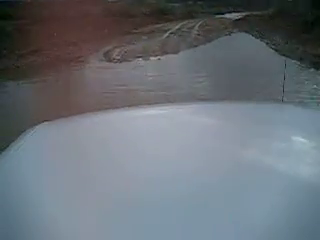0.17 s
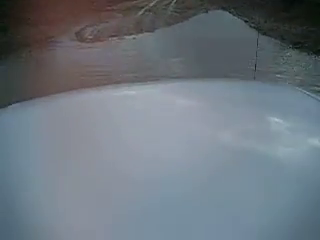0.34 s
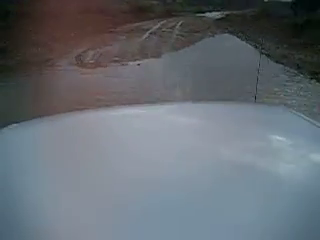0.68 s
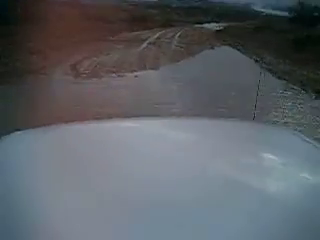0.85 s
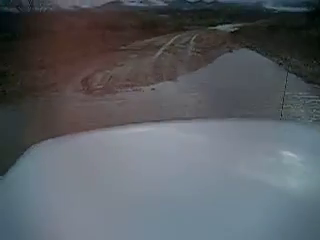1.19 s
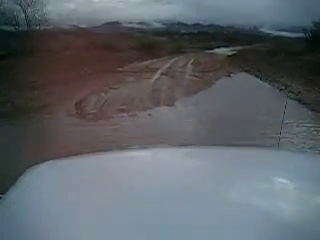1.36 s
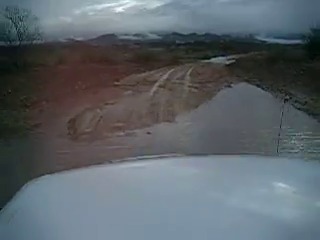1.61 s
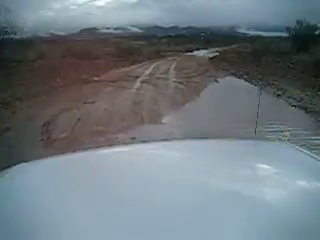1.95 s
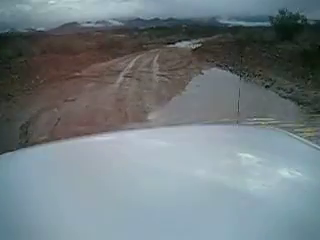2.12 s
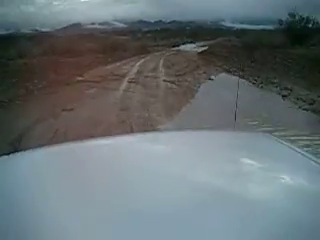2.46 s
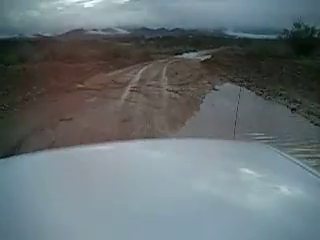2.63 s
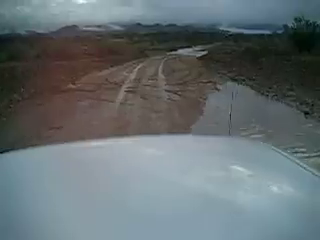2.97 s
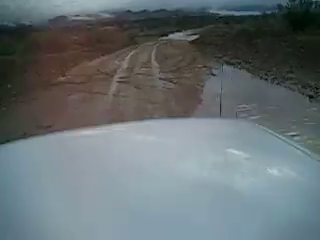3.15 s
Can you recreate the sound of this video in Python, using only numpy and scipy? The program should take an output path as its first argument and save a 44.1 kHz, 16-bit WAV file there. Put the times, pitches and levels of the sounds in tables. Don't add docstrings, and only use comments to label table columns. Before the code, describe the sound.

Low steady engine drone inside a vehicle creeping through water, with dull thumps, plops and sloshing.

```python
import sys
import numpy as np
from scipy import signal
from scipy.fft import rfft, irfft
from scipy.io import wavfile
from scipy.ndimage import uniform_filter1d

SR = 44100
rng = np.random.default_rng(int(sys.argv[2]) if len(sys.argv) > 2 else 0)


def to_linear_factor(level_db):
    exponent = np.asarray(level_db, float) / 20
    return 10 ** exponent


def wav_record(signal):
    frames = np.transpose(np.atleast_2d(signal))
    bounded = np.clip(frames, -1, 1)
    quanta = np.round(bounded * 32767).astype(np.int16)
    wavfile.write(sys.argv[1], SR, quanta)


N = 145530


def evened(x):
    return x / np.sqrt(np.mean(x ** 2) + 1e-20)


def curve(table, column=1):
    rows = np.transpose(table)
    return np.interp(np.arange(N) / SR, rows[0], rows[column])


def drift(top_hz):
    count = N // 64 + 2
    z = rfft(rng.standard_normal(count))
    hz = np.arange(len(z)) * SR / N
    rolloff = 1 / (1 + (hz / top_hz) ** 4)
    slow = irfft(z * rolloff * (hz > 0.4), count)
    return np.interp(np.arange(N) / 64, np.arange(len(slow)), evened(slow))


def noise(shape, size, patchy_db, wide_hz, long_s):
    hop, hz = size // 4, np.fft.rfftfreq(size, 1 / SR)
    real, imaginary, patches = rng.standard_normal((N // hop + 5, len(hz), 3)).T
    patches = uniform_filter1d(patches, max(round(wide_hz * size / SR), 1), axis=0)
    patches = evened(uniform_filter1d(patches, max(round(long_s * SR / hop), 1), axis=1))
    f, db = np.transpose(shape)
    colour = np.interp(np.log(hz + 1), np.log(f + 1), db)
    colour -= 18 * np.log2(np.maximum(f[0] / (hz + 1), 1))
    colour -= 12 * np.log2(np.maximum(hz / f[-1], 1))
    z = (real + 1j * imaginary) * to_linear_factor(colour[:, None] + patchy_db * patches)
    return evened(signal.istft(z, nperseg=size, noverlap=size - hop)[1][:N])


def add(mix, s, sound):
    part = mix[round(s * SR):][:len(sound)]
    part += sound[:len(part)]


# order of the cycle, level in dB.
ORDER_DB = [(2, -38), (3, -32.5), (4, -29), (5, -22), (6, -37.5), (7, -40), (8, -31.5), (9, -38), (10, -40),
            (11, -30.5), (12, -36.5), (13, -23.5), (14, -36.5), (15, -37), (16, -40.5), (21, -45.5),
            (22, -42.5), (23, -37.5), (24, -41), (26, -45.5), (28, -44)]
# time in seconds, cycle rate in Hz.
SPEED = [(0, 12.55), (.15, 12.53), (.45, 12.28), (.7, 12.34), (1.1, 11.97), (1.5, 12.14), (1.72, 12.52),
         (2.02, 12.54), (2.022, 12.12), (2.4, 12.25), (3.05, 12.54), (3.3, 12.55)]
# time in seconds, level in dB, exhaust ring in dB.
ENGINE_LEVEL = [(0, -3.5, -2.5), (.22, 3.5, -8), (.3, 0.5, -2), (.6, 1, 2), (.9, 0, 0), (1.04, -2.5, 1.5),
                (1.085, -5, -0.5), (1.14, -1, 2), (1.5, -2.5, 1), (1.9, 0, 1.5), (2.1, 1, -0.5), (2.5, -1, 1),
                (2.56, -2, -2), (2.62, 0, 2.5), (2.83, 0, 1.5), (2.87, -2, -2), (2.92, -1, 1), (3.3, 0, 0)]


def engine():
    waver_db, waver_turns, ring_from_order = 1.3, 0.03, 12.5
    turns = np.cumsum(curve(SPEED)) / SR
    ring_db = curve(ENGINE_LEVEL, column=2)
    drone = np.zeros(N)
    for order, db in ORDER_DB:
        level_db = db + waver_db * drift(5) + ring_db * (order > ring_from_order)
        phase = round(order) * turns + rng.random() + waver_turns * drift(3.3)
        drone += to_linear_factor(level_db) * np.sin(2 * np.pi * phase)
    return np.sqrt(2) * to_linear_factor(curve(ENGINE_LEVEL)) * drone


def mode(db, hz, t60, rise_s):
    t = np.arange(SR // 3) / SR
    return (1 - np.exp(-t / rise_s)) * to_linear_factor(db - 60 * t / t60) * np.sin(2 * np.pi * hz * t)


# start in seconds, level in dB, pitch in Hz, t60 in seconds.
THUMPS = [(0.394, -13, 107.5, 0.13), (0.463, 2, 81.7, 0.057), (0.529, -10, 104.8, .15),
          (1.043, 2.5, 60, 0.072), (1.256, -11, 60.5, 0.24), (1.441, -11, 62, 0.1),
          (2.131, -14, 60.2, 0.11), (2.458, -17, 278, 0.077), (2.59, -8, 56.4, 0.12),
          (2.822, -8, 58.4, 0.13), (3.102, -13, 49.3, 0.17)]


def thumps():
    out, t = np.zeros(N), np.arange(SR // 3) / SR
    add(out, 0, -to_linear_factor(-11.5 - 60 * t / 0.11) * np.cos(2 * np.pi * 74.9 * t))
    for s, db, hz, t60 in THUMPS:
        add(out, s, mode(db + 9, hz, t60, rise_s=0.023))
    return out


# start in seconds, level in dB, pitch in Hz, t60 in seconds.
PLOPS = [(.326, -8.5, 544, 0.027), (.348, -33.5, 380, 0.046), (.438, -15.5, 563, 0.035),
         (.508, -14, 292, 0.048), (.53, -17.5, 420, .06), (.553, -11, 543, 0.022), (.76, -19.5, 600, 0.055),
         (1.264, -20, 694, 0.028), (2.068, -17, 285, 0.029), (2.27, -17, 592, 0.033),
         (2.77, -21.5, 293, 0.23), (2.808, -9, 173, 0.13), (2.817, -8.5, 272.8, 0.14),
         (2.893, -29, 755, 0.11), (3.26, -14, 300, 0.082)]


def plops():
    out = np.zeros(N)
    for s, db, hz, t60 in PLOPS:
        add(out, s, mode(db + 3, hz, t60, rise_s=0.0043))
    return out


# start in seconds, level in dB, pitch in Hz, decay length in seconds.
SLAPS = [(0.144, -39, 495, 0.013), (0.308, -35, 565, 0.014), (0.417, -28, 1065, 0.042),
         (0.431, -41, 550, 0.0088), (0.563, -21, 550, 0.0083), (0.748, -21, 900, 0.014),
         (0.843, -33.5, 1290, 0.013), (1.15, -42, 1098, 0.0079), (1.27, -39, 686, 0.011),
         (1.357, -26, 1400, 0.024), (2.267, -32, 600, 0.025), (2.576, -31, 1500, 0.054),
         (2.896, -26, 1000, 0.014), (3.194, -31.5, 1150, .05)]


def slaps():
    out, t = np.zeros(N), np.arange(SR // 6) / SR
    for s, db, hz, length in SLAPS:
        band = signal.butter(2, [hz / 1.6, hz * 1.6], "band", fs=SR, output="sos")
        puff = evened(signal.sosfilt(band, rng.standard_normal(len(t))))
        envelope = np.minimum(t / 0.0074, 1) * np.exp(-t / length)
        add(out, s, to_linear_factor(db - 5) * puff * envelope)
    return out


# frequency in Hz, density in dB per Hz.
RUMBLE = [(15, -3.5), (35, -0.5), (60, -5.5), (88, -7), (170, -8.5), (225, -14.5), (300, -11.5),
          (480, -24.5)]


def rumble(flutter):
    return flutter * noise(RUMBLE, size=2048, patchy_db=0.8, wide_hz=120, long_s=0.06)


# frequency in Hz, density in dB per Hz.
WASH = [(200, -12), (400, -2), (600, -3.5), (1000, -12.5), (1800, -16.5), (2600, -30.5)]


def wash(flutter):
    return flutter ** 0.4 * noise(WASH, size=512, patchy_db=-0.5, wide_hz=600, long_s=0.04)


def gurgles():
    per_s, kinds = 700, 24
    happens = rng.random(N) < per_s / SR
    size = happens * to_linear_factor(4 * np.minimum(rng.exponential(1, N), 5))
    kind, out = rng.integers(0, kinds, N), np.zeros(N)
    for k, hz in enumerate(np.geomspace(260, 2200, num=kinds)):
        u = np.arange(0, 6, hz / SR)
        blip = u * np.exp(-u / 0.67) * np.sin(2 * np.pi * u * (1 + 0.037 * u))
        blip *= (hz / 500) ** -0.15
        out += signal.oaconvolve(size * (kind == k), blip)[:N]
    return evened(out)


# frequency in Hz, density in dB per Hz.
HISS = [(900, 2), (2000, -2.5), (3200, -6), (3800, -7)]


def spray():
    return noise(HISS, size=512, patchy_db=1.06, wide_hz=900, long_s=0.07)


# time in seconds, churn in dB.
CHURN = [(0, -31), (.1, -29), (.28, -32.5), (.43, -29), (.58, -37), (.78, -34.5), (1.04, -34),
         (1.085, -35.5), (1.13, -36.5), (1.37, -32), (1.65, -34), (1.95, -37.5), (2.28, -32), (2.6, -35.5),
         (2.83, -32.5), (2.87, -33), (2.91, -35.5), (3.3, -34.5)]


def water():
    churn = curve(CHURN)
    surge = churn - churn.mean()
    flutter = to_linear_factor(2.6 * np.tanh(drift(35)))
    body = to_linear_factor(-22 + 0.7 * surge) * rumble(flutter)
    floor = to_linear_factor(churn) * (to_linear_factor(-2) * wash(flutter) + to_linear_factor(-6) * gurgles())
    return body + floor + to_linear_factor(-38.5 + 0.092 * surge) * spray()


def scene():
    return (engine() + thumps() + plops() + slaps() + water())[None]


def gain_control(dry):
    knee_db, squeeze, recover_db_per_s = -14, 0.64, 151
    power_db = 10 * np.log10(abs(uniform_filter1d(dry[0] ** 2, 600)) + 1e-12)
    fall = np.arange(N) * recover_db_per_s / SR
    held_db = np.maximum.accumulate(power_db + fall) - fall
    over_db = np.maximum(held_db - knee_db, 0)
    late_db = np.concatenate([np.zeros(500), uniform_filter1d(over_db, 300)])[:N]
    ending = np.minimum(np.arange(N, 0, -1) / 120 + 0.2, 1)
    return dry / to_linear_factor(squeeze * late_db) * ending


def band_limit(x):
    edge_hz, width_hz = 4209, 1480
    hz = np.fft.rfftfreq(2 * N, 1 / SR)
    edge = np.clip((hz - edge_hz) / width_hz + 0.5, 0, 2)
    mirrored = np.concatenate([x, x[:, ::-1]], axis=1)
    return irfft(rfft(mirrored) * to_linear_factor(-60 * edge ** 2))[:, :N]


def skip(x):
    at_s, half_jump_db, ease_s = 2.02085, -18.8, 0.0012
    t = np.arange(N) / SR - at_s
    return x + to_linear_factor(half_jump_db) * np.sign(t) * np.exp(-abs(t) / ease_s)


def roll_off(x):
    return signal.sosfilt(signal.butter(12, 16400, fs=SR, output="sos"), x)


def record(dry):
    mix = skip(band_limit(gain_control(dry)))
    return roll_off(mix)


dry = scene()
out = record(dry)
wav_record(out)
```